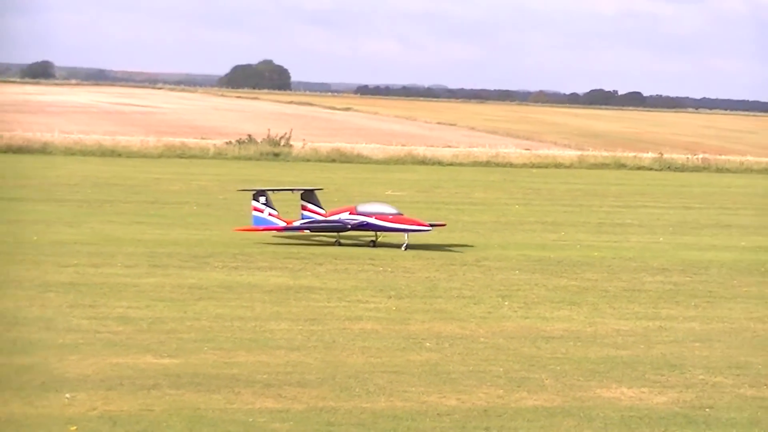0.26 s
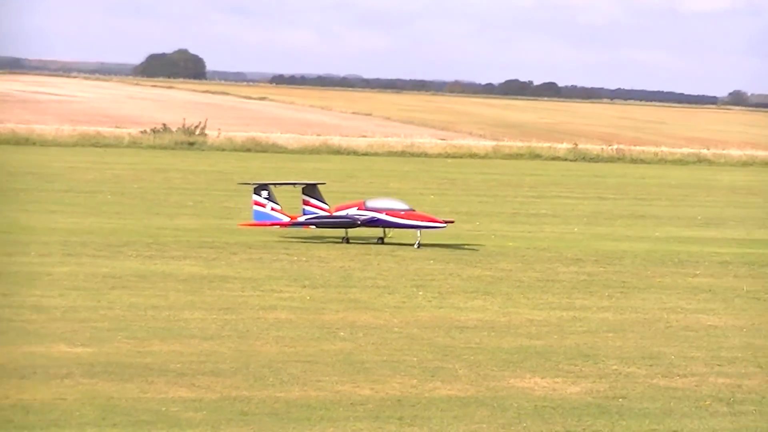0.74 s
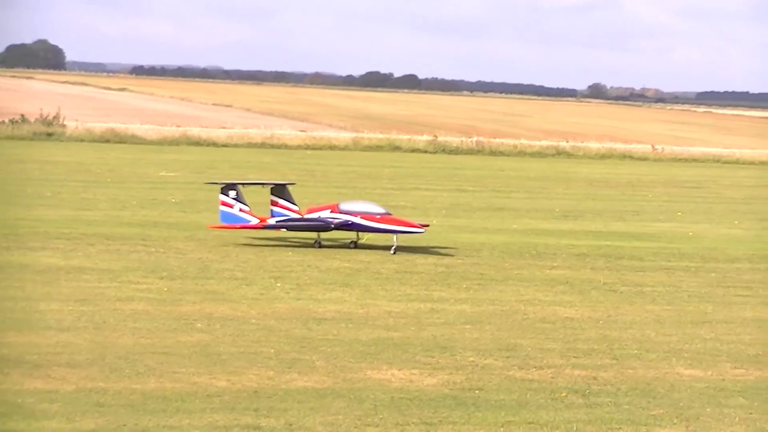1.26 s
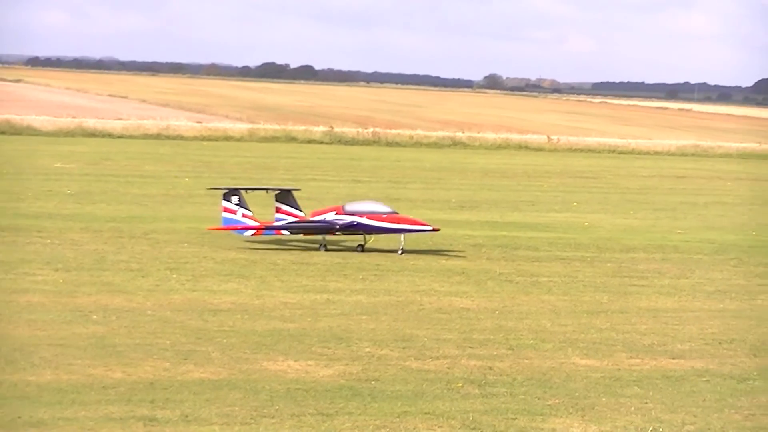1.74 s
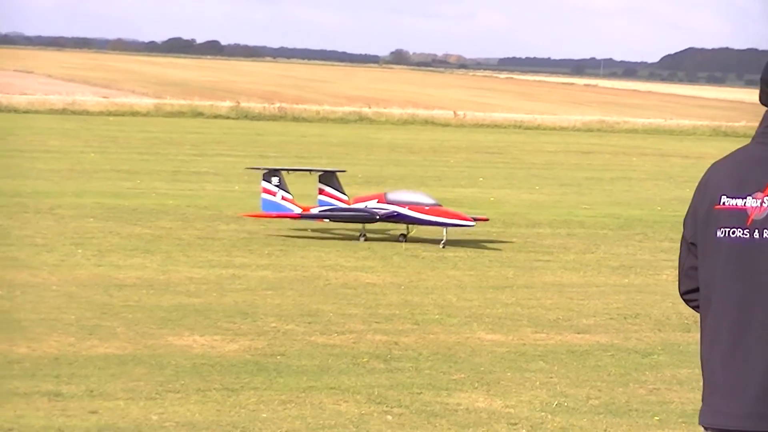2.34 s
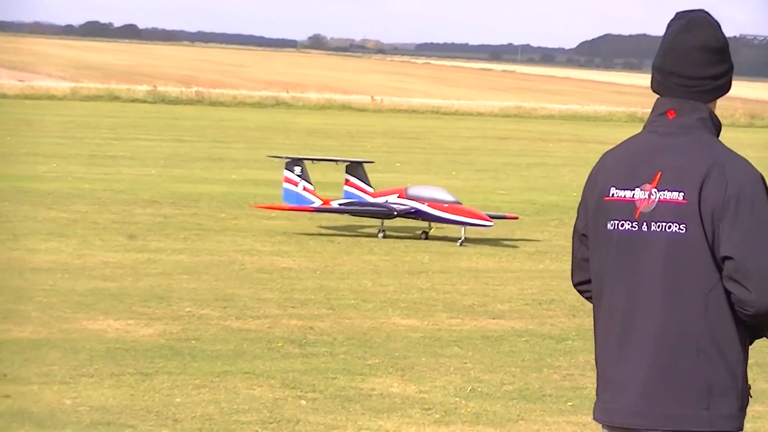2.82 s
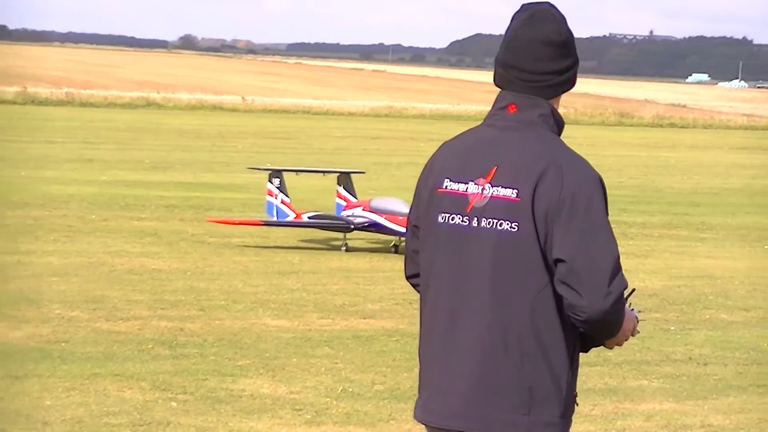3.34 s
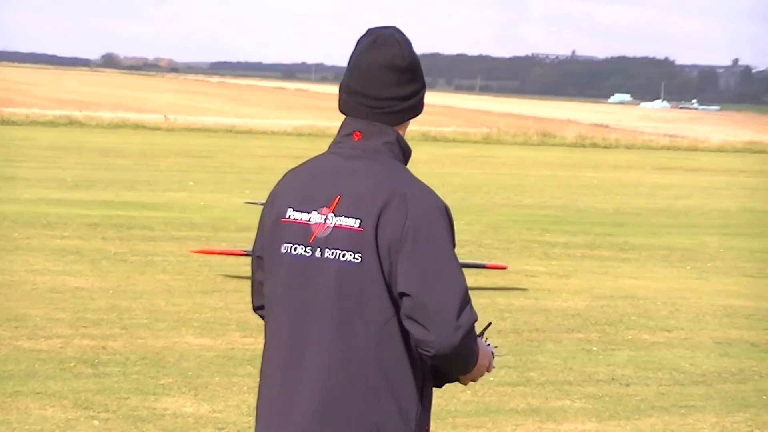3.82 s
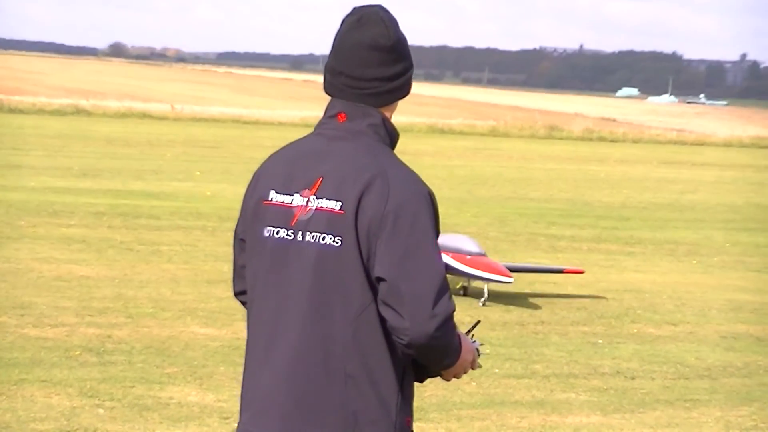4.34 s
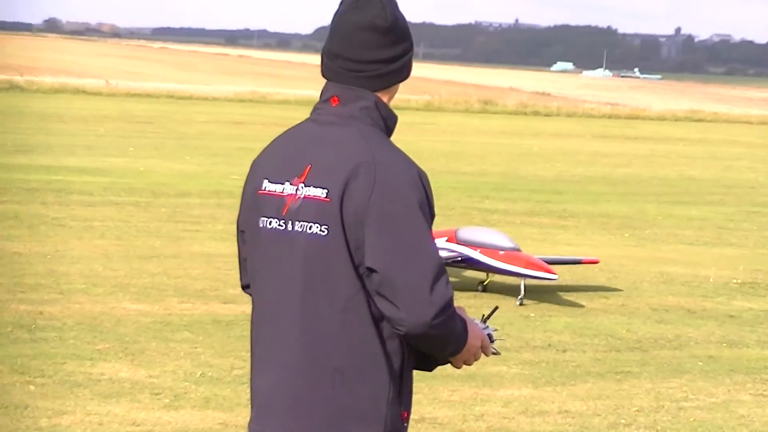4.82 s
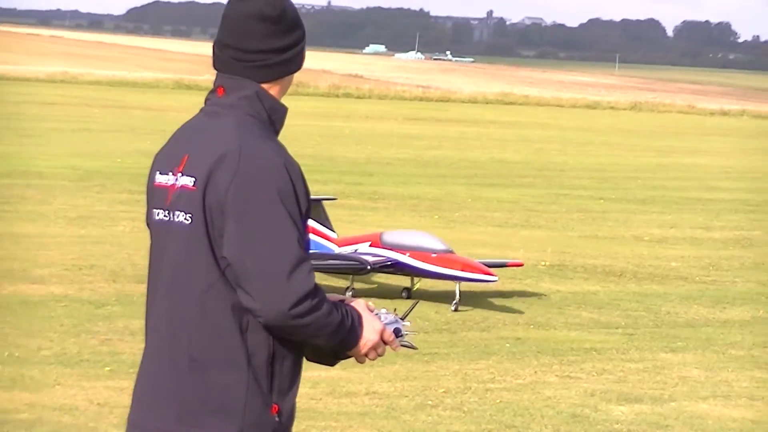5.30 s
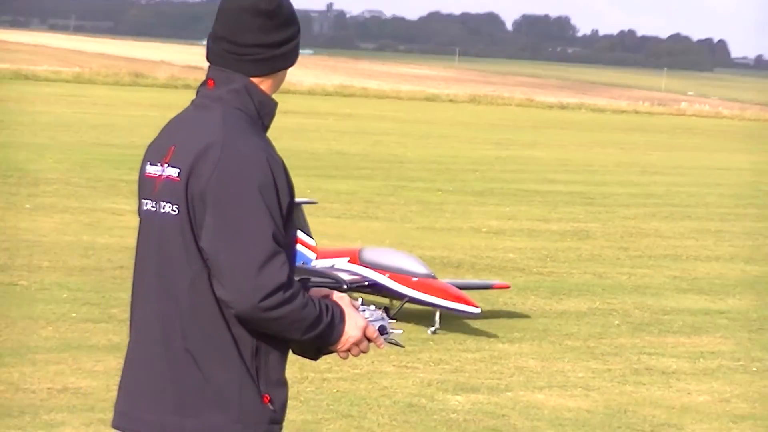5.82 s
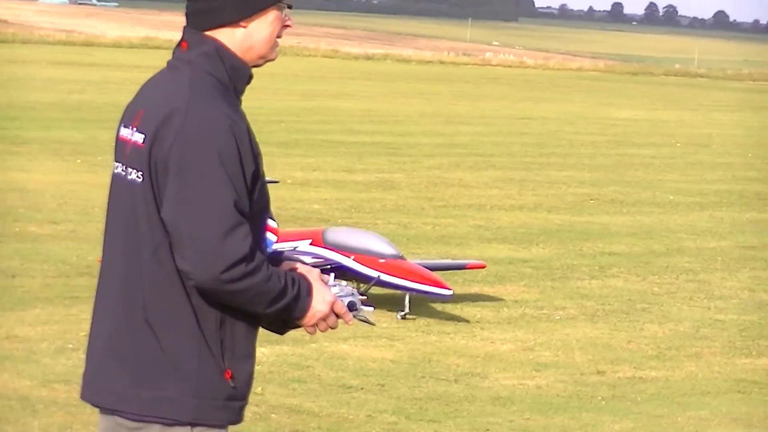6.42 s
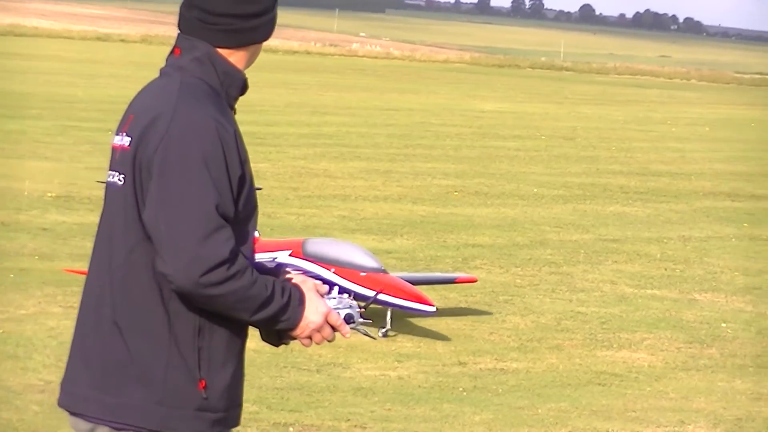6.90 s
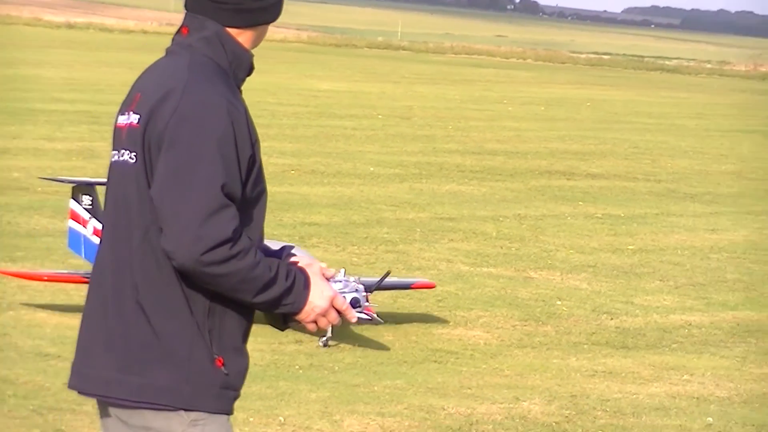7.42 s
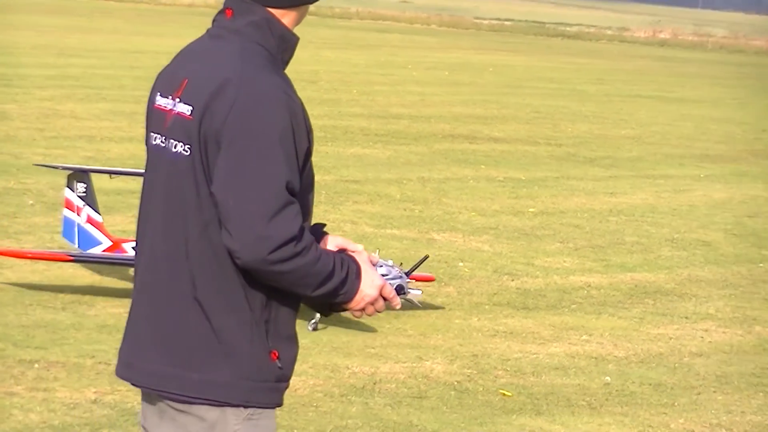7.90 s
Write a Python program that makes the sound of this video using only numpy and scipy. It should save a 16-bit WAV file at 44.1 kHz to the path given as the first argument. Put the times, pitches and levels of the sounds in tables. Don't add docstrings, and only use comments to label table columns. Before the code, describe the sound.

Airy turbine hiss and piercing whistle from a model jet taxiing over grass, wind buffeting the microphone, pitch dropping and finally rising near the camera.

```python
import sys
import numpy as np
from scipy import signal
from scipy.fft import rfft, irfft, next_fast_len
from scipy.io import wavfile
from scipy.ndimage import uniform_filter1d, map_coordinates

SR = 44100
rng = np.random.default_rng(int(sys.argv[2]) if len(sys.argv) > 2 else 0)


def amp(db):
    return 10 ** (np.asarray(db, float) / 20)


def write(x):
    x = np.atleast_2d(x).T
    wavfile.write(sys.argv[1], SR, np.round(np.clip(x, -1, 1) * 32767).astype(np.int16))


N = 359415
TOP_HZ = 15740

# (time [s], nearness [0 far - 1 near])
NEARNESS = [
    (0, 0.26),
    (3, 0.16),
    (5.5, 0.38),
    (6.5, 0.85),
    (8.15, 1),
]
# (time [s], half length [s], treble [dB], middle [dB])
EDDIES = [(.21, 0.12, 2, -1), (.63, 0.083, 4.5, 0.3), (0.955, 0.087, -5, -2.5), (1.117, 0.052, -4.5, 0),
          (1.208, 0.062, 0.5, 0.5), (1.56, .1, 1, 0.3), (1.682, 0.041, -6, 2.5), (1.794, 0.053, 4.5, 1.5),
          (1.95, 0.09, 0.9, 0), (2.306, 0.11, -3.5, -3.5), (2.454, 0.11, 3, 0.5), (2.94, 0.17, 5.5, 5),
          (2.95, 0.042, 2, -0.5), (3.173, 0.056, 0, -1), (3.36, 0.13, 6.5, -1), (3.597, 0.05, 2, -0.5),
          (3.764, 0.11, 5, 2.5), (4.12, 0.062, 2.5, 1.5), (4.26, 0.051, -5.5, 0.5), (4.59, 0.12, 4, 1),
          (4.974, 0.083, 6.5, 2.5), (5.3, 0.21, 2, 2), (5.567, 0.065, 5.5, 2), (6.01, 0.13, -4, 4),
          (6.57, 0.035, -1, -3), (6.684, 0.03, 3.5, 3.5), (6.76, 0.062, -1.5, -1), (7.1, .1, -0.5, -1),
          (7.207, 0.036, 3, 0), (7.46, 0.045, -0.5, 1), (7.685, 0.12, -8, -4.5), (7.832, .04, -1, 1.5),
          (7.945, .05, -4.5, 0)]


def unit(x):
    return x / np.sqrt(np.mean(x ** 2) + 1e-20)


def along(points, hz):
    f, v = np.transpose(points)
    return np.interp(np.log(hz + 1), np.log(f + 1), v)


def curves(rows):
    s, *cols = np.transpose(rows)
    return [np.interp(np.arange(N) / SR, s, c) for c in cols]


def moments():
    return np.arange(0, N + 16, 16) / SR


def full(slow):
    return np.array([np.interp(np.arange(N) / SR, moments(), row) for row in np.atleast_2d(slow)])


def bumps(rows):
    s, length, *height = np.transpose(rows)
    return full(np.array(height) @ np.exp(-((moments() - s[:, None]) / length[:, None]) ** 2))


def glide(rows):
    s, value = np.transpose(rows)
    basis = lambda t: np.c_[np.abs(t[:, None] - s) ** 3, np.ones(len(t)), t]
    ends = np.c_[[np.ones(len(s)), s], np.zeros((2, 2))]
    weights = np.linalg.solve(np.r_[basis(s), ends], np.r_[value, 0, 0])
    return full(basis(moments()) @ weights)[0]


def wobble(rate):
    knots = rng.standard_normal(int(N * rate / SR) + 4)
    return map_coordinates(knots, [np.arange(N) * rate / SR])


def filtered(x, response):
    m = next_fast_len(N + 8192)
    return irfft(rfft(x, m) * response(np.fft.rfftfreq(m, 1 / SR)), m)[..., :N]


def rush(spectrum, patchy_db):
    z = signal.stft(rng.standard_normal(N), nperseg=512)[2]
    field = uniform_filter1d(rng.standard_normal(z.shape), size=22, axis=0)
    field = uniform_filter1d(field, size=8, axis=1)
    noise = signal.istft(z * amp(patchy_db * unit(field)), nperseg=512)[1][:N]
    return unit(filtered(noise, lambda hz: amp(along(spectrum, hz))))


def gusts():
    # (time [s], left [dB], right [dB], dying time [s per 20 dB])
    puff_rows = [(.4, -60, -60, .3), (1.1, -62, -64, .5), (2.5, -60, -66, .4), (4.6, -60, -64, .5),
                 (6.0, -54, -60, .5), (6.6, -55, -58, .4), (.51, -50, -44, .1), (.535, -50, -52, .08),
                 (.59, -49, -44, .02), (.69, -53, -49, .03), (.735, -46, -45, .06), (.8, -48, -47, .03),
                 (.87, -58, -49, .025), (.96, -52, -54, .02), (1.45, -59, -64, .06), (2.11, -58, -66, .05),
                 (2.87, -51, -62, .06), (2.975, -44.5, -54, .07), (3.16, -52, -63, .1),
                 (3.25, -48, -59, .07), (3.33, -48, -59, .12), (3.59, -51, -63, .4), (4.27, -48, -60, .05),
                 (4.33, -51, -58, .06), (4.46, -55, -57, .09), (4.93, -53, -58, .14), (5.23, -55, -57, .05),
                 (5.62, -52, -64, .4), (5.87, -53, -59, .03), (6.04, -51, -58, .04), (6.11, -49, -61, .04),
                 (6.22, -49, -57, .04), (6.36, -53, -56, .03), (6.44, -56, -54, .04), (6.53, -54, -62, .07)]
    s, left_db, right_db, dies = np.transpose(puff_rows)
    since = moments() - s[:, None]
    rise_s = .03
    swell = amp(-20 * np.maximum(-since / rise_s, since / dies[:, None]))
    breeze = amp(-80 + 4.5 * wobble(3.83))
    return breeze + full(amp([left_db, right_db]) @ swell)


def wind():
    # (frequency [Hz], density [dB per Hz])
    buffet_spectrum = [(25, -40), (60, -31), (120, -5.5), (280, 7.5), (450, -2.5), (900, -21), (1500, -25),
                       (3000, -80)]
    # (time [s], level [dB], port [0 left, 1 right], width [ms])
    pop_rows = [(.503, -34, 1, .65), (.509, -37, 0, .65), (.511, -25, 1, .6), (.53, -32, 1, .45),
                (.535, -26, 0, .65), (.567, -31, 1, .5), (.573, -33, 0, .55), (.597, -33, 1, .5),
                (.675, -38, 1, .65), (.692, -36, 1, .7), (.737, -30, 1, .8), (.742, -34, 0, .65),
                (.752, -35, 0, .65), (.794, -37, 0, .8), (.807, -37, 1, .65), (.812, -32, 0, .7),
                (.865, -37, 1, .8), (.965, -40, 0, .7), (6.038, -35, 0, .6), (6.209, -28, 0, .28),
                (6.221, -29, 0, .5), (6.44, -42, 1, 2.5), (6.517, -30, 0, .55)]
    even = lambda x: x / np.sqrt(np.abs(uniform_filter1d(x ** 2, size=1300)) + .05)
    puffs = np.array([amp(2) * gain * even(rush(buffet_spectrum, patchy_db=-1.0)) for gain in gusts()])
    for s, db, port, width_ms in pop_rows:
        near = np.arange(-200, 200) / SR * 1000 / width_ms
        kick = (1 - near ** 2) * np.exp(-near ** 2 / 2)
        puffs[port, round(s * SR) - 200:][:400] += (1 - 2 * port) * amp(db) * kick
    return puffs


def ducts(x):
    # (centre [Hz], width [Hz], depth far [dB], depth turning [dB], depth near [dB])
    duct_notches = [(373, 30, 10.5, 8.5, 2.5), (585, 110, 2, 0, -2.5), (803, 104, 1.5, 2, 2),
                    (1155, 72, -1.5, 1, 3), (1255, 38, 5.5, 2, -5), (1410, 28, 10, 8, 5.5),
                    (1623, 40, 2.5, -6.5, -3.5), (1826, 58, 1, -1, -4.5), (2073, 90, 3, 0, 5.5),
                    (2290, 70, -1.5, -1, 5), (2734, 110, 2.5, 3.5, 4), (3010, 55, 2, -1, -1),
                    (3130, 83, -0.5, 5.5, 6.5), (3344, 166, 6.5, 7.5, 19), (3877, 94, 4.5, 6.5, 11.5),
                    (4300, 80, 3.5, -0.5, 4.5), (4470, 120, -0.5, 5, 3), (4826, 90, 7.5, 6.5, 7),
                    (5180, 72, 0, 12, -1), (5320, 93, 4.5, 0.5, 1.5), (5770, 120, 3.5, 6, 9),
                    (6200, 87, 5.5, 5, 5), (6480, 110, 2.5, 4, 7), (6950, 120, 6.5, 1, 1),
                    (7130, 1000, 0, 1, 5.5), (7430, 138, 10.5, 4, 8), (7980, 100, 3, 2, 3),
                    (8100, 90, -2, -2, 0), (8600, 150, 4, 6.5, 4), (9060, 80, -0.5, 1, 5),
                    (13250, 220, 0, -1, 4), (14500, 450, -1, 3, 1)]
    # (time [s], aspect [0 far - 1 turning - 2 near], stretch of the pattern [%])
    view = [
        (0, 0.27, 0.42),
        (3, 0.12, -0.42),
        (4.3, 0.59, 0.47),
        (5.9, 1.25, -0.55),
        (6.5, 1.65, -1.3),
        (7.1, 2.03, 0.18),
        (7.5, 1.94, -0.0043),
        (8.15, 2, 0.42),
    ]
    hz, t, z = signal.stft(x, SR, nperseg=1024)
    s, aspect, stretch = np.transpose(view)
    aspect, stretch = np.interp(t, s, aspect), np.interp(t, s, stretch)
    centre_hz, width_hz, *depth_db = np.transpose(duct_notches)
    shares = np.clip(1 - np.abs(np.clip(aspect, 0, 2) - np.arange(3)[:, None]), 0, 1)
    pattern_db = np.exp(-((hz[:, None] - centre_hz) / width_hz) ** 2) @ np.transpose(depth_db) @ shares
    bins = np.arange(len(hz))[:, None] / (1 + stretch / 100)
    places = [bins, 0 * bins + np.arange(len(t))]
    pattern_db = map_coordinates(pattern_db, places, order=1, mode="nearest")
    return signal.istft(z * amp(-pattern_db), SR, nperseg=1024)[1][:N]


def ground(x):
    # (time [s], centre [Hz], depth [dB], lift of the highest hiss [dB])
    bounce = [(0, 4200, 2, 3), (.9, 3660, 3, -2.5), (1.6, 3560, 4, -3), (2.2, 3550, 2, -4.5),
              (2.9, 3250, 1, -9), (3.3, 3570, 6, -7), (3.6, 4430, 2, -4.5), (4.0, 5730, 4, -6.5),
              (4.4, 5860, 5, -3.5), (4.8, 5860, 9.5, -5.5), (5.05, 4730, 4.5, -1.5), (5.3, 4070, 9.5, -2.5),
              (5.6, 4800, 6, 0), (6.0, 4270, 7, 11), (6.3, 6200, -1, 7), (6.8, 7800, 1.5, 9),
              (7.3, 7500, 10.5, -9), (8.15, 7200, 5, -5)]
    # (time [s], half length [s], level [dB])
    wisp_rows = [(.1, .15, 2), (.9, .1, 1), (1.22, .06, 3), (1.52, .08, 3), (1.68, .045, -9),
                 (2.2, .12, -2), (2.45, 0.065, 10), (2.78, .05, -5), (2.97, .07, -5), (3.18, .04, -5),
                 (3.6, .25, -7), (4.1, 0.24, -5), (4.6, .12, 5), (5.02, .1, 4), (5.3, 0.11, 5),
                 (5.57, .05, 3), (5.8, .05, -1), (6.8, .2, -4), (7.25, .1, -5), (7.9, 0.11, -3)]
    hz, t, z = signal.stft(x, SR, nperseg=512)
    s, *columns = np.transpose(bounce)
    centre_hz, depth_db, lift_db = [np.interp(t, s, c) for c in columns]
    bell = lambda middle_hz, octaves: np.exp(-(np.log2((hz[:, None] + 1) / middle_hz) / octaves) ** 2)
    tilt_db = lift_db * (bell(11800, 0.35) + 0.27 * bell(16000, 0.25))
    dip_db = depth_db * bell(centre_hz, 0.55)
    wisp_db = np.interp(t, np.arange(N) / SR, bumps(wisp_rows)[0]) * bell(14000, 0.26)
    return signal.istft(z * amp(tilt_db - dip_db + wisp_db), SR, nperseg=512)[1][:N]


def flow():
    # (time [s], exhaust [dB], intake [dB])
    jet_levels = [(0, -40.5, -33), (.6, -42.5, -35), (1.0, -43.5, -30), (1.5, -43.5, -30.5),
                  (2.2, -41, -29), (2.9, -43.5, -31), (3.2, -41, -36), (3.8, -39.5, -37),
                  (4.15, -39.5, -35.5), (4.4, -36.5, -34.5), (5.0, -39.5, -38), (5.75, -38, -39),
                  (6.1, -42, -40), (6.4, -44, -46.5), (7.0, -42.5, -34), (7.35, -38.5, -22),
                  (7.6, -36, -21), (8.15, -34.5, -29.5)]
    # (frequency [Hz], density [dB per Hz])
    roar_spectrum = [(40, -43), (100, -29.5), (230, -9), (380, -4), (550, -0.5), (900, -3.5), (1700, 0.5),
                     (2600, 0.5), (3300, -10.5), (5000, -15)]
    # (frequency [Hz], density [dB per Hz])
    rush_spectrum = [(1800, -55), (2500, -15.5), (3100, -3.5), (4200, -3), (5400, 1), (6500, 1), (7300, -7),
                     (8500, -9.5), (11000, -80)]
    # (frequency [Hz], density [dB per Hz])
    hiss_spectrum = [(5000, -60), (6500, -5), (7600, -0.5), (8500, 1), (10000, 2), (12300, -4),
                     (12800, -14), (13200, -25), (16000, -90)]
    # (frequency [Hz], density [dB per Hz])
    air_spectrum = [(10500, -60), (12200, -7), (13200, 10), (14500, 6), (15500, 6), (16000, -16)]
    exhaust_db, intake_db = curves(jet_levels)
    treble_db, middle_db = bumps(EDDIES)
    facing_db = intake_db - intake_db.mean()
    roar_db = exhaust_db + 0.27 * middle_db
    rush_db = exhaust_db + 6 + 0.22 * facing_db + middle_db
    hiss_db = intake_db + treble_db
    air_db = -53 + 0.69 * facing_db + .9 * treble_db
    eddies = wobble(11)
    low = amp(roar_db + 0.42 + 0.097 * eddies) * rush(roar_spectrum, patchy_db=0.4)
    middle = amp(rush_db + 2.5 + .5 * eddies) * rush(rush_spectrum, patchy_db=0.72)
    high = amp(hiss_db + 0.04 + 0.57 * eddies) * rush(hiss_spectrum, patchy_db=1.56)
    top = amp(air_db + 1.2 + 1.1 * eddies) * rush(air_spectrum, patchy_db=1.5)
    lull_s, lull_db, drop_s, recovers_s = 6.52, 8.5, 0.0055, 0.066
    since = np.arange(N) / SR - lull_s
    lull = amp(-lull_db * np.clip(since / drop_s, 0, 1) * np.exp(-np.abs(since) / recovers_s))
    return ground(ducts(low + middle + high + top)) * lull


def fading():
    # (time [s], depth [dB], half length [s])
    fade_rows = [(1.7, 8, .08), (3.067, 7, 0.032), (3.41, 14, 0.061), (3.58, 8, .04), (3.73, 10, .04),
                 (5.007, 9, .03), (5.098, 12, .04), (5.217, 9, 0.11), (5.46, 13, 0.061), (5.66, 10, .04),
                 (5.817, 11, 0.088), (5.988, 8, 0.014), (6.192, 3, 0.097), (6.255, 1, 0.0088),
                 (6.307, 6, 0.012), (6.35, 1, .012), (6.452, 4, .015), (6.544, 1, .01), (6.6, 4, 0.024),
                 (6.394, 6, 0.016), (6.481, 16, 0.017), (6.666, 10, 0.021), (6.803, 23, 0.035),
                 (7.14, 3.5, 0.12), (7.39, 10.5, 0.052), (7.568, 13, 0.023), (7.771, 11, 0.023),
                 (7.848, 2, .05), (7.88, 3, 0.047), (7.91, 10, 0.011), (8.078, 7, 0.0092),
                 (7.536, 5, 0.011), (7.7, 2, 0.013), (7.989, 15, 0.024), (8.015, 10, 0.014),
                 (8.108, 5, .012)]
    t = moments()
    gain = np.ones(len(t))
    for s, db, length in fade_rows:
        dip = 1 / np.cosh(np.clip((t - s) / length, -20, 20)) ** 2
        gain *= np.sqrt(1 - (1 - amp(-2 * db)) * dip)
    return full(gain)[0]


def whine():
    # (time [s], blade-passing tone [Hz])
    rotor_speed = [(0.2, 9428), (0.58, 9327), (1.12, 8271), (1.63, 7787), (1.97, 7688), (3.31, 7636),
                   (3.67, 7691), (4.1, 8094), (4.45, 8314), (4.73, 8256), (5.07, 7755), (5.53, 7355),
                   (5.78, 7207), (6.07, 6754), (6.47, 5760), (7.23, 5120), (7.63, 5486), (8.15, 6322)]
    # (time [s], half length [s], blade-passing shift [Hz])
    speed_bends = [
        (2.0, .12, 8),
        (5.3, .15, 7),
        (6.35, .12, -14),
        (6.7, .1, 9),
        (7.5, .15, -6),
        (7.85, .15, 8),
        (8.15, .07, -20),
    ]
    # (time [s], blade tone [dB], overtone [dB])
    beam_levels = [(0, -35, -24), (.6, -30, -6), (.68, -34, -45), (1.15, -38, -43), (1.45, -43, -42),
                   (1.95, -42, -36), (2.1, -43, -44), (2.8, -48, -50), (2.97, -45.5, -29), (3.3, -45, -38),
                   (3.42, -59, -44), (3.75, -42.5, -40), (4.2, -46, -50), (5.0, -39.5, -27.5),
                   (6.22, -47, -26.5), (6.27, -49, -16), (7.74, -44, -16.5), (7.8, -41, -19.5),
                   (7.94, -43, -25.5), (8.15, -43, -30)]
    # (time [s], half length [s], level [dB])
    glint_rows = [(1.79, .05, 5), (2.1, .06, 3), (2.5, .06, 7), (2.98, 0.066, 10), (3.75, 0.1, 10),
                  (4.55, .1, 5), (5.06, .015, 10), (5.2, .12, -2), (.24, .012, -12), (.73, .02, -8),
                  (1.09, .015, -3), (4.16, .035, 6), (4.11, .025, -6), (7.42, .04, 6), (.3, .04, 3),
                  (5.4, .05, -3), (5.8, .05, -4), (5.97, .05, -10), (6.13, .07, 5.5), (6.67, 0.057, 6),
                  (6.97, 0.17, -4), (7.6, 0.33, -4), (6.8, .04, -4), (.12, .04, -1), (.38, 0.057, -1),
                  (.86, .03, -15), (1.33, .05, -6), (1.58, .05, 4), (2.28, .06, -3), (3.18, .04, -6),
                  (3.5, .1, -4), (3.95, .05, -1), (4.68, .03, -7), (5.3, .04, -5), (5.65, .05, -5),
                  (6.35, 0.066, 5), (6.5, 0.054, -4)]
    # (shaft order [1], level [dB])
    shaft_tones = [
        (1, -67),
        (2, -64),
    ]
    blades = 8
    blade_hz = glide(rotor_speed) + bumps(speed_bends)[0]
    blade_db, overtone_db = curves(beam_levels)
    blade_db = np.maximum(blade_db + bumps(glint_rows)[0], -66)
    treble_db = bumps(EDDIES)[0]
    turns = np.cumsum(blade_hz) / SR / blades
    far = 1 - curves(NEARNESS)[0]

    def sine(order, drift):
        return np.sqrt(2) * np.sin(2 * np.pi * order * turns + drift * wobble(30))

    halo = 1 + (.7 - .55 * far) * wobble(200)
    first = amp(blade_db + 1.2 * wobble(40) + .6 * wobble(20)) * halo * sine(blades, drift=2.2 - 1.9 * far)
    flicker = amp((.5 + 1.2 * far) * wobble(50) + .5 * wobble(120))
    flicker *= 1 + far * (.09 * wobble(1200) + .22 * wobble(110))
    second = amp(overtone_db + 0.39 * far * treble_db) * fading() * flicker
    second *= sine(2 * blades, drift=.2 + .7 * far)
    third = amp(-59 + 4 * wobble(12)) * (3 * blade_hz < TOP_HZ) * sine(3 * blades, drift=1.3)
    shaft = sum(amp(db + 4 * wobble(6)) * sine(order, drift=.8) for order, db in shaft_tones)
    lead = .04 * (1 - far) * np.gradient(second) * [[1], [-1]]
    pan_db = .27
    return first + third + shaft + lead + second * amp([[pan_db], [-pan_db]])


def scene():
    # (frequency [Hz], level under the middle [dB])
    side_levels = [(60, -56), (1300, -70), (2300, -30), (2700, -24), (3300, -32), (4100, -21), (4600, -29),
                   (5300, -25), (6200, -35.5), (15000, -36)]
    noise = flow()
    scatter = filtered(np.roll(noise, 700), lambda hz: amp(along(side_levels, hz)))
    scatter *= amp(7.6 * (curves(NEARNESS)[0] - 1))
    return wind() + noise + scatter * np.array([[1], [-1]]) + whine()


def top_cut(x):
    return signal.sosfilt(signal.butter(12, 15750, fs=SR, output="sos"), x)


def record(dry):
    # (from time [s], edge [Hz])
    band_edge = [(0, TOP_HZ), (5.65, 15150), (5.82, 14850), (5.98, 15150), (6.05, 14950), (6.1, 15150),
                 (6.125, 14650), (6.25, 15150), (6.31, 14850), (6.45, 15200), (6.51, 14600), (6.54, 13600),
                 (6.59, 15150), (6.76, TOP_HZ), (6.84, 14400), (6.89, TOP_HZ), (7.43, 15000),
                 (7.53, TOP_HZ), (7.6, 14900), (7.645, 13000), (7.75, 13600), (7.79, 15000), (7.85, TOP_HZ),
                 (7.89, 14100), (7.93, 13000), (7.97, TOP_HZ), (8.05, 13200), (8.07, TOP_HZ), (8.12, 14800)]
    # (time [s], share of bands [0-1])
    hole_share = [
        (0, 0),
        (6.7, 0),
        (7.0, .08),
        (7.3, .2),
        (7.75, .2),
        (7.85, .45),
        (7.97, .1),
        (8.15, .3),
    ]
    # (time [s], from [kHz], to [kHz])
    split_rows = [(.96, 6.3, 8.3), (1.11, 4.2, 5.2), (1.67, 5.7, 7.6), (1.72, 4.7, 5.7), (1.89, 4.7, 5.7),
                  (1.89, 11, 12.5), (1.95, 6.3, 8.3), (2.2, 8.3, 12.5), (2.35, 7.6, 9), (2.35, 9.6, 12.5),
                  (3.16, 13, 14.5), (4.14, 7.6, 9), (4.48, 5.7, 6.9), (4.48, 13, 14.5), (4.57, 4.7, 5.7),
                  (4.79, 10.3, 11.7), (5.22, 6.9, 8.3), (5.22, 9, 14.5), (5.6, 4.2, 5.2), (5.6, 6.9, 9),
                  (5.6, 10.3, 11.7), (5.69, 5.7, 7.6), (5.76, 4.2, 5.2), (5.76, 8.3, 9.6), (6.02, 5.7, 6.9),
                  (6.02, 10.3, 11.7), (7.87, 14.5, 15.7)]
    hz, t, z = signal.stft(dry, SR, nperseg=1024)
    tall_hz = hz[:, None]
    start, edge_hz = np.transpose(band_edge)
    edge_hz = edge_hz[np.searchsorted(start, t, "right") - 1]
    ragged_hz = 120 * np.repeat(rng.standard_normal(len(t)), 2)[:len(t)] * (edge_hz < TOP_HZ)
    kept = tall_hz < np.minimum(edge_hz + ragged_hz, TOP_HZ)
    chance = rng.random((len(hz) // 8 + 1, len(t) // 2 + 1))
    chance = np.kron(chance, np.ones((8, 2)))[:len(hz), :len(t)]
    kept &= (tall_hz < 13000) | (chance > np.interp(t, *np.transpose(hole_share)))
    split = sum((np.abs(t - s) < .011) * (tall_hz > 1000 * lo) * (tall_hz < 1000 * hi)
                for s, lo, hi in split_rows)
    z = z + amp(-3) * split * np.roll(z.mean(0), 9, axis=1) * [[[1]], [[-1]]]
    mix = signal.istft(z * kept, SR, nperseg=1024)[1][:, :N]
    return top_cut(mix)


dry = scene()
out = record(dry)
write(out)
```